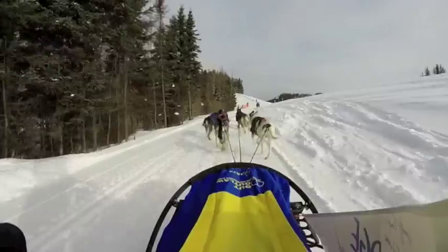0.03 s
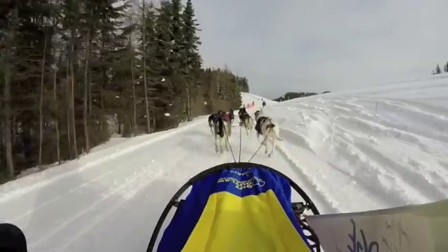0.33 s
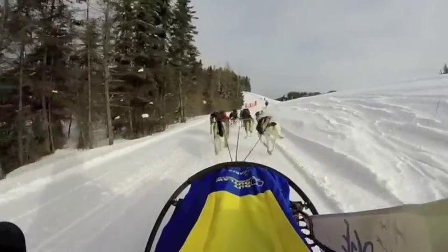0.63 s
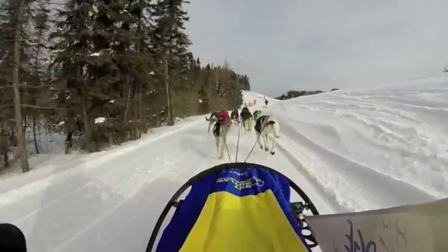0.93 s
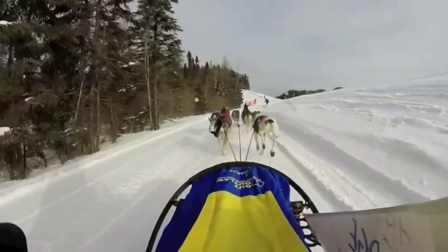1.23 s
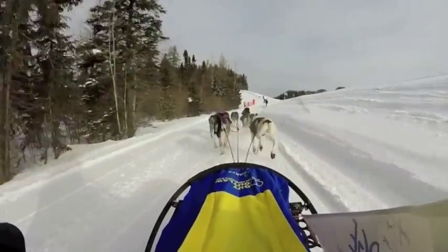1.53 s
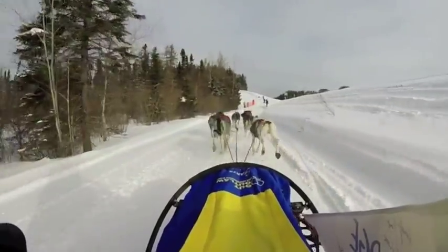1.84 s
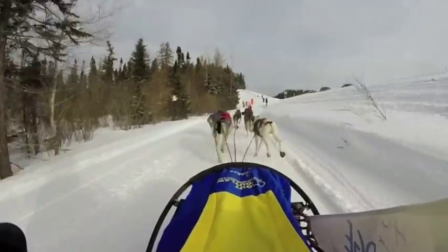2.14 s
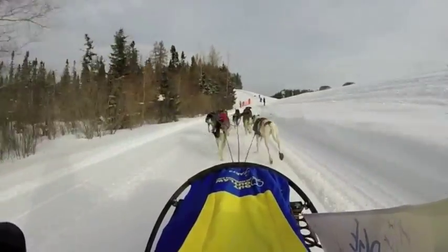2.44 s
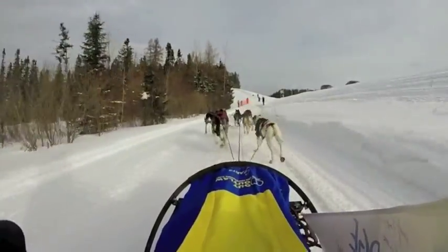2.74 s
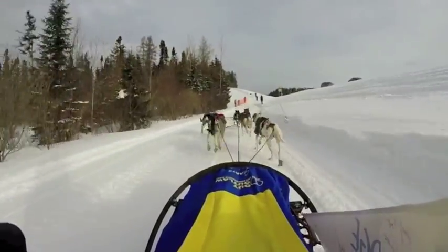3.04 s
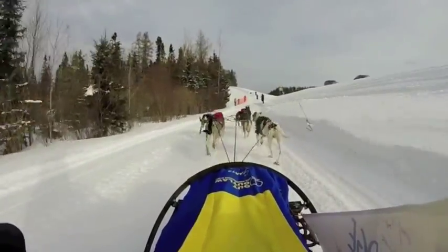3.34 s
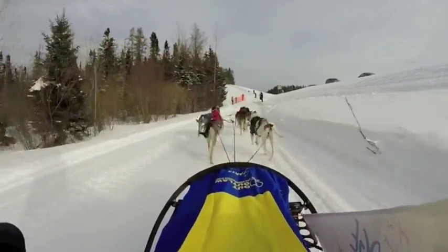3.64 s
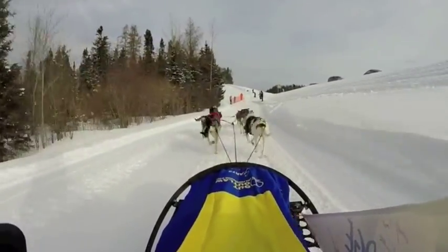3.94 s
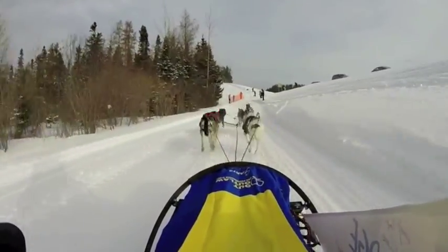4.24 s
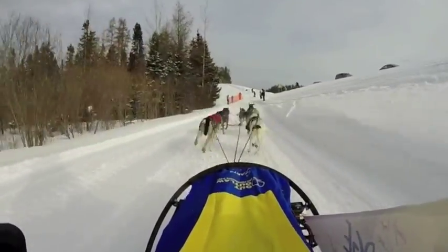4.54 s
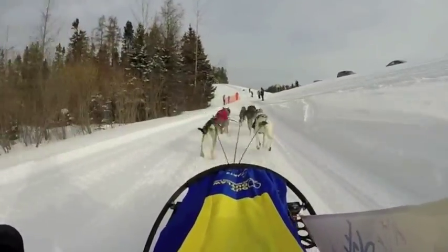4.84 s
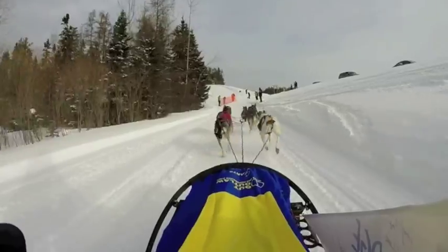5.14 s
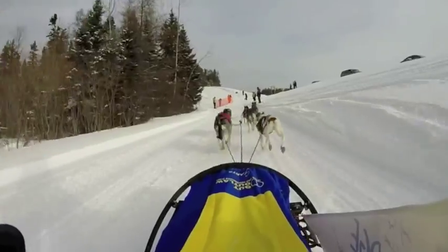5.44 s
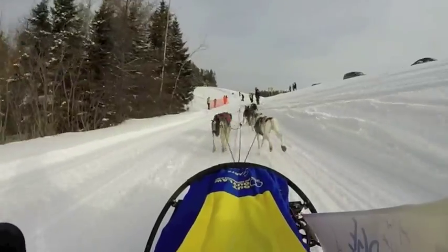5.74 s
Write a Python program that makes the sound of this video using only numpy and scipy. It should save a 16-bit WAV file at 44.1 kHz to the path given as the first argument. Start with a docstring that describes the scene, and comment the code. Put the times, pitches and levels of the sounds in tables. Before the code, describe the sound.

Sled runners scrape and crunch over packed snow while the frame drums and knocks over bumps, with low wind on the microphone.

```python
"""A dog sled runs along a packed snow trail, heard by a camera in a closed housing on its frame.
It fades in on rumbling wind, the clink of a tow-line hook and the scrape of the runners, coloured by
the housing. Half a second in, crusts crunch, cold snow squeaks and the hardest bump knocks the frame.
From there the scrape surges with the team's pull and lulls over crests, while bumps keep the frame
drumming and hard swings tick the mount. Late on, the fittings click loudest, then the sled bag swells."""
import sys
import numpy as np
from scipy import signal
from scipy.fft import rfft, irfft, next_fast_len
from scipy.io import wavfile
from scipy.ndimage import map_coordinates

SR = 44100
rng = np.random.default_rng(int(sys.argv[2]) if len(sys.argv) > 2 else 0)


def bounce(signal):
    """Save signal as a 16-bit WAV file at the path given by the first command-line argument."""
    frames = np.transpose(np.atleast_2d(signal))
    limited = np.clip(frames, -1, 1)
    pcm = np.round(limited * 32767).astype(np.int16)
    wavfile.write(sys.argv[1], SR, pcm)


N = 263718


def amp(db):
    """Decibels to gain."""
    return 10 ** (np.asarray(db) / 20)


def unit(x):
    """Scale to rms 1."""
    return x / np.sqrt(np.mean(x ** 2) + 1e-20)


def clock():
    """The time of each sample in seconds."""
    return np.arange(N) / SR


def automation(points):
    """A lane of straight ramps through (time, value) points."""
    times, values = np.transpose(points)
    return np.interp(clock(), times, values)


def wobble(rate):
    """Smooth random modulation, rate knots a second."""
    return map_coordinates(rng.standard_normal(N // 8), [clock() * rate])


def hump(at, rise, ease):
    """A rounded swell of height 1 that builds over rise seconds and falls ease times as long."""
    out = np.zeros(N)
    near = slice(max(int((at - 4 * rise) * SR), 0), int((at + 5 * rise) * SR))
    offset = (np.arange(*near.indices(N)) / SR - at) / rise
    out[near] = np.exp(-np.where(offset > 0, offset / ease, offset) ** 2)
    return out


def hits(events, rise, decay):
    """An envelope that climbs to each (time, level) event and dies away after it."""
    t, out = clock(), np.zeros(N)
    for at, db in events:
        near = slice(max(int(at * SR) - SR // 4, 0), int(at * SR) + SR // 4)
        age = t[near] - at
        out[near] += amp(db) * np.exp(np.minimum(age / rise, -age / decay))
    return out


def eq_curve(points):
    """Gain against frequency from (frequency, level) points on a log axis."""
    freqs, db = np.transpose(points)
    return lambda hz: amp(np.interp(np.log(hz + 1), np.log(freqs), db))


def equalise(x, curve):
    """Causal (minimum-phase) filter that follows a gain curve."""
    size = 2 * next_fast_len(N // 2 + SR // 4)
    gain = np.maximum(curve(np.fft.rfftfreq(size, 1 / SR)), 1e-6)
    cepstrum = irfft(np.log(gain), size)
    cepstrum[1:size // 2] *= 2
    cepstrum[size // 2 + 1:] = 0
    return irfft(rfft(x, size) * np.exp(rfft(cepstrum)), size)[:N]


def noise(points):
    """Noise of rms 1 with the given spectrum."""
    return unit(equalise(rng.standard_normal(N), eq_curve(points)))


# gusts of head wind: (time [s], relative level [dB])
GUSTS = [(0.1, -37.5), (0.25, -27.5), (.7, -31), (1.05, -22), (1.25, -29.5), (1.6, -21), (1.85, -28.5),
         (2.2, -31.5), (2.5, -20.5), (2.85, -23.5), (3.05, -29), (3.4, -24.5), (3.65, -23), (4.2, -27.5),
         (4.5, -23.5), (4.93, -21), (5.25, -23), (5.98, -31.5)]
# their sub-heavy rumble: (frequency [Hz], relative level [dB])
WIND_EQ = [(10, -23), (22, 4.5), (30, -7.5), (42, -5.5), (70, -0.5), (150, -21.5), (400, -42.5),
           (1500, -100)]

def wind():
    """The head wind buffets the housing and lays a low bed under the ride."""
    return amp(automation(GUSTS) + 4.5 + 1.1 * wobble(1.1)) * noise(WIND_EQ)


# clicks of the fittings: (time [s], relative level [dB])
FITTING_CLICKS = [(2.141, -51), (2.867, -55.5), (4.583, -37.5), (4.655, -47.5), (4.661, -55), (5.617, -63)]
# their bright tone: (frequency [Hz], relative level [dB])
CLICK_EQ = [(1000, -18), (3500, -23), (4700, 10.5), (6400, 6), (7200, -5), (9500, -4), (11500, -11.5),
            (14000, -9), (15500, -27.5)]

def fittings():
    """The fittings give tight, dry clicks with hardly any ring."""
    return amp(2.5) * hits(FITTING_CLICKS, rise=0.00047, decay=0.001) * noise(CLICK_EQ)


# clinks of the tow line's metal snap hook: (time [s], relative level [dB])
HOOK_CLINKS = [(0.106, -47), (0.7813, -41.5), (1.308, -60), (1.731, -48.5), (2.816, -43), (3.23, -53.5),
               (5.5562, -43.5), (5.887, -47)]
# modes of the hook: (frequency [Hz], relative level [dB], time to fall 60 dB [s])
HOOK_MODES = [(1500, 21, .04), (4680, 16, 0.03), (9400, -1.5, .018), (10300, -4.5, .014),
              (11400, -6.5, .016), (12100, -8, .014)]

def snap_hook():
    """Each clink rings the hook's modes in a new balance; the taut line chokes them quickly."""
    out, t = np.zeros(N + SR), np.arange(SR // 10) / SR
    attack = 1 - np.exp(-t / 0.0008)
    for at, db in HOOK_CLINKS:
        ring = sum(amp(mode_db + rng.normal(0, 3) - 60 * t / t60) * np.sin(2 * np.pi * hz * t)
                   for hz, mode_db, t60 in HOOK_MODES)
        out[round(at * SR):][:len(t)] += amp(db - 2.5) * ring * attack
    chatter = unit(amp(2.8 * wobble(1100)))  # the contact is loose
    return out[:N] * chatter


# squeaks of cold snow: (time [s], pitch [Hz], level [dB])
SNOW_SQUEAKS = [(.436, 1660, -19.5), (.48, 1420, -19), (0.498, 1620, -21), (2.856, 1520, -26)]

def squeaks():
    """Snow sticks and slips under a runner in a brief, rough, rising chirp."""
    t, out = clock(), np.zeros(N)
    glide_hz_per_s = 3700
    rough_phase = 0.44 * wobble(350)
    for at, hz, db in SNOW_SQUEAKS:
        cycles = hz * (t - at) + glide_hz_per_s * (t - at) ** 2 / 2
        tone = np.sqrt(2) * np.sin(2 * np.pi * cycles + rough_phase)
        out += amp(db) * hump(at, rise=0.0043, ease=0.73) * tone
    return out


# bumps in the trail: (time [s], swing level [dB], relative knock level [dB])
BUMPS = [(0.259, -11.5, -33.5), (.48, -16, -26), (.566, -11.5, -14.5), (.81, -17.5, -27.5),
         (.89, -12.5, -35), (0.932, -10, -31.5), (0.977, -10, -21.5), (1.093, -10.5, -25.5),
         (1.213, -8.5, -23.5), (1.336, -11.5, -27), (1.399, -15, -20.5), (1.521, -19.5, -37.5),
         (1.592, -19, -25.5), (1.742, -12, -19), (1.857, -12, -34), (2.017, -10, -19), (2.157, -10, -26),
         (2.232, -10, -31), (2.31, -10, -21.5), (2.376, -14.5, -24.5), (2.477, -15, -22),
         (2.604, -15, -25.5), (2.7, -13.5, -27), (2.863, -10.5, -28.5), (2.935, -14, -37.5),
         (3, -10.5, -44), (3.161, -11, -28), (3.255, -14, -22), (3.424, -12, -34.5), (3.528, -12.5, -17),
         (3.673, -12, -24.5), (3.77, -9.5, -34), (3.848, -13, -24.5), (3.99, -11.5, -34),
         (4.098, -9, -26.5), (4.216, -13.5, -22), (4.325, -11, -30), (4.46, -15, -34), (4.528, -8, -24),
         (4.594, -11.5, -26.5), (4.667, -11.5, -21.5), (4.789, -11.5, -23), (4.935, -14, -21),
         (5.098, -9, -21.5), (5.202, -12.5, -23), (5.305, -14, -24.5), (5.36, -12.5, -34),
         (5.421, -12, -27), (5.561, -13, -22.5), (5.73, -13, -36.5), (5.795, -10.5, -21.5),
         (5.84, -10, -24.5), (5.968, -12, -26)]
# steady boom of the sled bag: (time [s], relative level [dB])
BAG_BOOM = [(.1, -36.5), (.5, -29.5), (1.05, -27), (1.55, -30), (1.85, -37.5), (2.5, -28), (3, -28),
            (3.45, -27.5), (3.8, -28.5), (4.1, -28.5), (4.8, -28), (5.2, -22.5), (5.5, -28), (5.98, -25.5)]
# the frame's deep swing, boomy overtones and dull knock: (frequency [Hz], relative level [dB])
SWING_EQ = [(40, -34.5), (56, -12), (69, -5.5), (80, 8), (87, -1.5), (98, -5.5), (125, -28.5), (250, -61.5),
            (500, -120)]
BOOM_EQ = [(70, -31), (110, -0.5), (160, 2.5), (183, -5), (220, -2), (270, -10.5), (400, -22), (800, -38),
           (2500, -98.5)]
KNOCK_EQ = [(100, -15), (160, 5), (230, 0), (350, -8), (600, -19.5), (1200, -31), (4000, -66.5)]

def frame():
    """The frame drums near 80 Hz; each bump widens its swing and knocks, and the sled bag booms along."""
    times, swing_db, knock_db = np.transpose(BUMPS)
    resonance = signal.hilbert(noise(SWING_EQ))
    # flatten the envelope: the phase still wanders, but the trail sets the level
    swing = unit(resonance.real / np.sqrt(np.abs(resonance) ** 2 + 0.15))
    judder = amp(-21 + 2.9 * wobble(22))  # small ripples between bumps
    bump_power = sum((amp(db) * hump(at, rise=0.024, ease=0.88)) ** 2 for at, db in zip(times, swing_db))
    swing_level = np.sqrt(judder ** 2 + bump_power)
    bag_level = amp(automation(BAG_BOOM) - 1 + 2.3 * wobble(26))
    boom = np.hypot(amp(-14) * swing_level, bag_level) * noise(BOOM_EQ)
    knocks = amp(-1.5) * hits(zip(times, knock_db), rise=0.009, decay=0.012) * noise(KNOCK_EQ)
    return swing_level * swing + boom + knocks


# crisp tick of the mount's joint: (frequency [Hz], relative level [dB])
TICK_EQ = [(500, -17), (2000, 2), (4000, 5.5), (6200, 7), (7500, -0.5), (9500, -7), (12000, -12),
           (15000, -24)]

def mount(motion, play, stiffening, tick_db):
    """Beyond its play the mount stiffens: the peaks of the swing sharpen and the joint ticks."""
    press = np.clip(np.abs(motion) - play, 0, 0.15)
    ticks = amp(tick_db) * press * noise(TICK_EQ)
    return motion + stiffening * np.sign(motion) * press ** 2 + ticks


# muffling by the housing's walls: (frequency [Hz], relative level [dB])
WALL_EQ = [(150, -20.5), (400, -12.5), (900, -13.5), (1300, -13.5), (2000, -10.5), (2750, -19), (3400, -17),
           (4000, -33.5), (4800, -30), (5250, -38.5), (6500, -40), (7300, -53.5), (10000, -54.5),
           (15000, -67.5)]
# resonances of the housing: (frequency [Hz], width [Hz], relative level [dB])
HOUSING_PEAKS = [(1029.5, 46, -6.5), (1160, 71, -11), (1459, 152, -5), (1632, 230, -1.5), (1970, 68, -4),
                 (2231, 221, -0.5), (2386, 320, -6), (4140, 110, -40), (4527, 160, -24), (5530, 170, -32),
                 (6410, 140, -33.5)]

def housing(hz):
    """Gain curve of the closed housing: boxy resonances on top of a dull, broad response."""
    peak_power = sum((amp(db) / (1 + ((hz - centre) / width) ** 2) ** 2) ** 2
                     for centre, width, db in HOUSING_PEAKS)
    return np.sqrt(eq_curve(WALL_EQ)(hz) ** 2 + peak_power)


def snow(grains_per_s, spread_db, hiss_db):
    """Snow grains snap at random moments and sizes over a smooth sliding hiss."""
    snaps = rng.random(N) < grains_per_s / SR
    sizes = amp(spread_db * np.clip(rng.standard_normal(N), -2, 2))
    polarity = rng.choice([-1, 1], N)
    return unit(unit(snaps * sizes * polarity) + amp(hiss_db) * rng.standard_normal(N))


# crusts and lumps giving way: (time [s], relative level [dB])
CRUST_BREAKS = [(0.4293, -16), (0.4769, -14), (0.5243, -12), (0.562, -10), (0.6716, -14.5), (0.782, -11),
                (0.815, -15.5), (1.3024, -11.5), (1.5652, -19), (1.7037, -13.5), (2.2916, -20),
                (2.5638, -12), (2.8149, -18), (3.6394, -15), (4.0844, -19), (4.2068, -18), (4.4153, -18),
                (4.566, -11), (4.848, -22), (5.2504, -11), (5.495, -23), (5.8919, -16)]
# their crunch, duller than the sliding hiss: (frequency [Hz], relative level [dB])
CRUST_EQ = [(500, -5), (1400, 0.5), (2400, 1.5), (3500, -3), (7000, -7)]

def crusts():
    """A crust breaks under a runner in a short, dense burst of grains."""
    envelope = hits(CRUST_BREAKS, rise=0.00091, decay=0.009)
    grains = snow(grains_per_s=5300, spread_db=-0.5, hiss_db=-2.0)
    return amp(-6.5) * equalise(envelope * grains, eq_curve(CRUST_EQ))


# pulls of the dog team: (time [s], relative level [dB], build time [s])
TEAM_PULLS = [(0.262, -29.5, 0.23), (0.492, -22, 0.1), (0.8, -24, 0.25), (1.042, -21.5, 0.031),
              (1.362, -24.5, 0.074), (1.527, -24.5, 0.074), (1.686, -24, 0.046), (1.973, -28.5, .04),
              (2.118, -28.5, 0.046), (2.51, -25, 0.14), (2.663, -27.5, 0.031), (2.826, -30.5, .1),
              (3.126, -24.5, 0.039), (3.4, -25, .08), (3.496, -26, .024), (3.735, -34, 0.16),
              (3.995, -25.5, 0.1), (4.293, -27, 0.03), (4.386, -26, 0.052), (4.508, -26, 0.13),
              (4.754, -32, 0.049), (4.9, -28, 0.078), (5.063, -24.5, .057), (5.185, -28, 0.062),
              (5.265, -25, .022), (5.35, -27, .07), (5.533, -27.5, 0.095), (5.709, -26, 0.13),
              (5.947, -25.5, 0.062)]
# lulls over crests: (time [s], level change [dB])
CREST_LULLS = [(1.27, -1), (1.785, -3.5), (1.895, -7), (2.72, -3), (3.01, -2), (3.57, -4.5), (4.82, -5.5),
               (5.45, -3.5), (5.865, -4.5)]

def scrape_fader():
    """The scrape's level in dB: pulls dig the runners in, and crests let the sled go light."""
    glide = amp(-32.5 + 0.64 * wobble(9))
    pull_power = sum((amp(db) * hump(at, rise, ease=1.2)) ** 2 for at, db, rise in TEAM_PULLS)
    lull_db = sum(db * hump(at, rise=0.017, ease=0.91) for at, db in CREST_LULLS)
    return 10 * np.log10(glide ** 2 + pull_power) + 0.5 * wobble(24) + lull_db


# gritty snow is brighter, soft snow darker: (time [s], treble level [dB])
SNOW_GRIT = [(0.1, 1), (0.5, 2.5), (0.95, 0.5), (1.3, -3), (1.8, 0.5), (2.5, 1.5), (3.3, 2.5), (4.2, 2),
             (4.7, -1), (5.2, -5.5), (5.55, 0.5), (5.98, 1.5)]

def runners():
    """The runners grind through clumps of snow and break crusts, all heard through the housing."""
    level = amp(scrape_fader() - 0.63)
    clumps = unit(amp(0.96 * wobble(50) + 1.2 * wobble(190)))
    scrape = level * clumps * snow(grains_per_s=2400, spread_db=5.0, hiss_db=0.0)
    treble = signal.sosfiltfilt(signal.butter(2, 3200, "high", fs=SR, output="sos"), scrape)
    scrape += (amp(automation(SNOW_GRIT)) - 1) * treble
    makeup_gain = 1 / np.sqrt(np.mean(housing(np.linspace(0, SR / 2, SR // 8)) ** 2))
    return makeup_gain * equalise(scrape + crusts(), housing)


def scene():
    """The mono mix: frame and wind come through the mount, under the snow and the hardware."""
    low_end = mount(frame() + wind(), play=0.39, stiffening=3.2, tick_db=-32.0)
    return (runners() + squeaks() + low_end + fittings() + snap_hook())[None]


def record(dry):
    """The mix fades in; the camera soft-clips the largest peaks and cuts off the extreme top."""
    ceiling, top_hz = 0.85, 15600
    faded = dry * np.clip((clock() - 0.082) / 0.081, 0, 1)
    rounded = faded / (1 + np.abs(faded / ceiling) ** 8) ** (1 / 8)
    return irfft(rfft(rounded) * (np.fft.rfftfreq(N, 1 / SR) < top_hz), N)


dry = scene()
out = record(dry)
bounce(out)
```